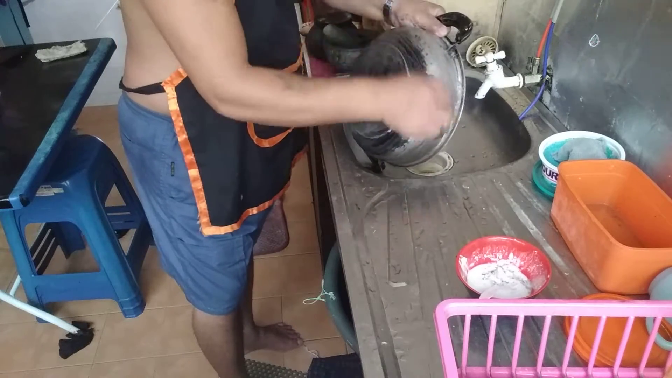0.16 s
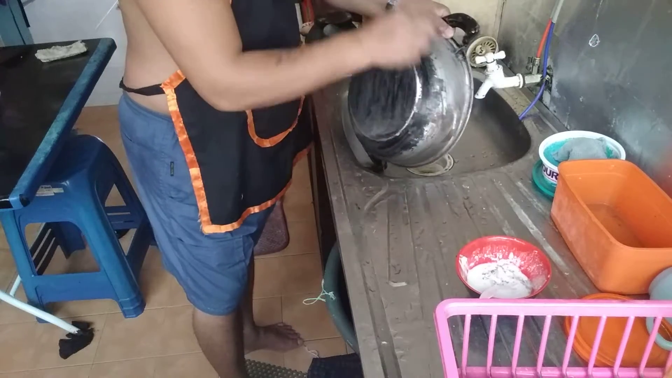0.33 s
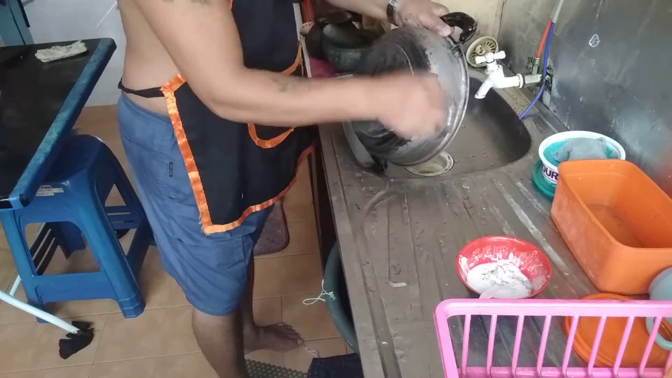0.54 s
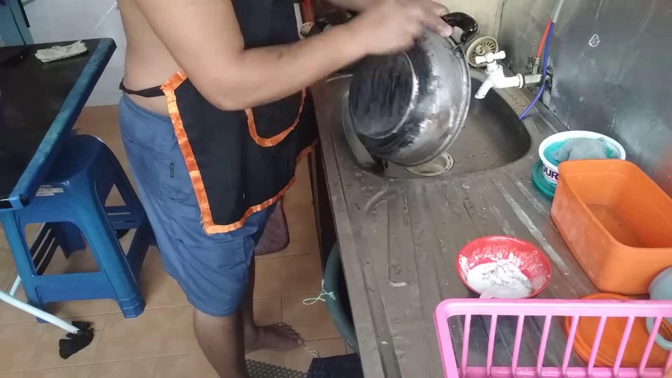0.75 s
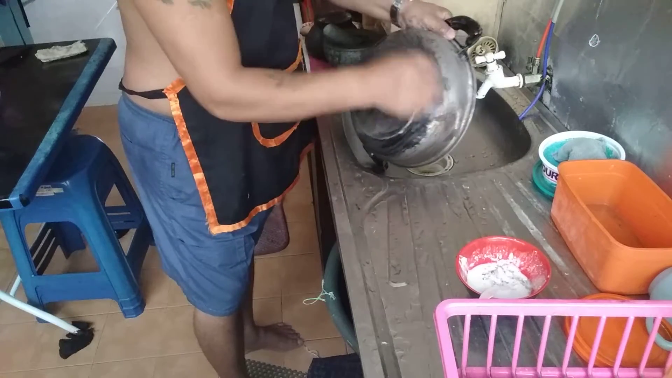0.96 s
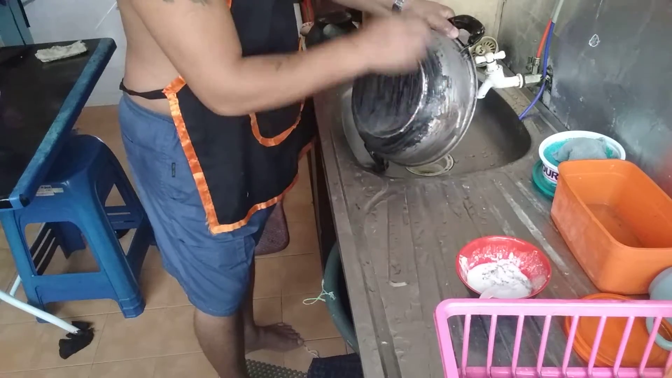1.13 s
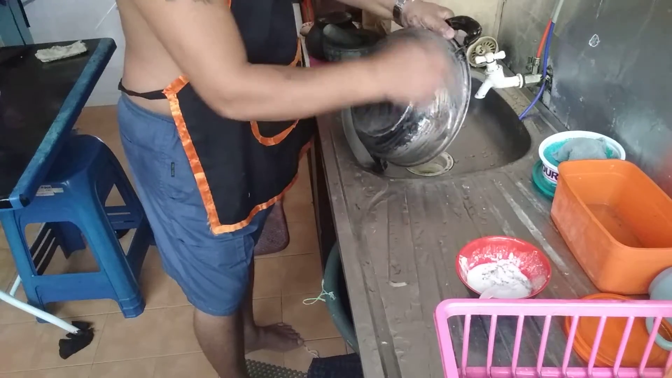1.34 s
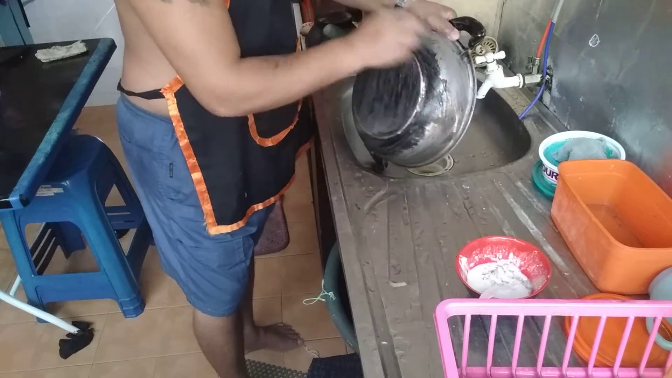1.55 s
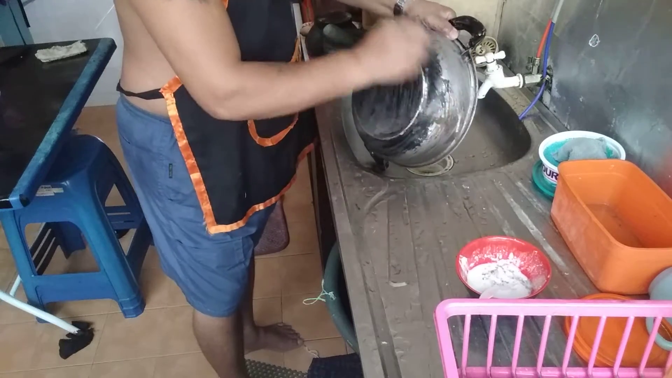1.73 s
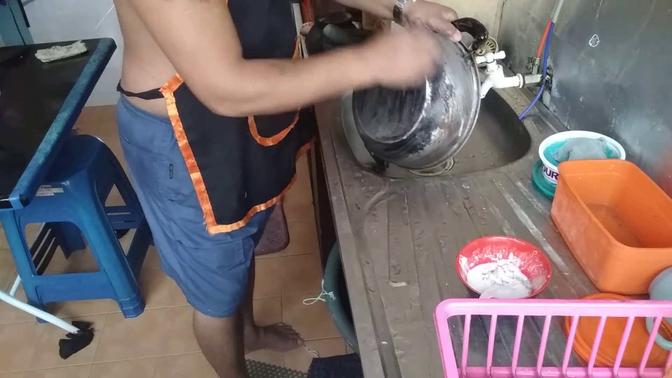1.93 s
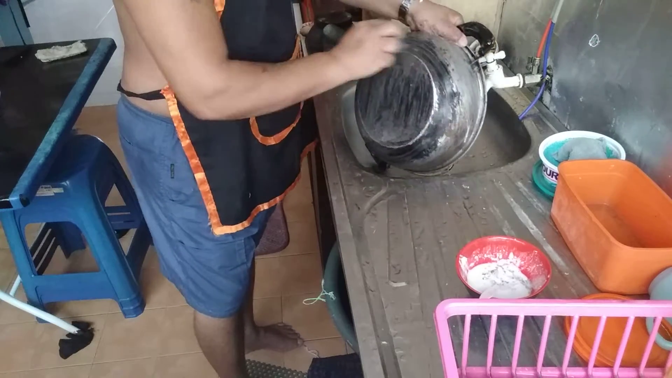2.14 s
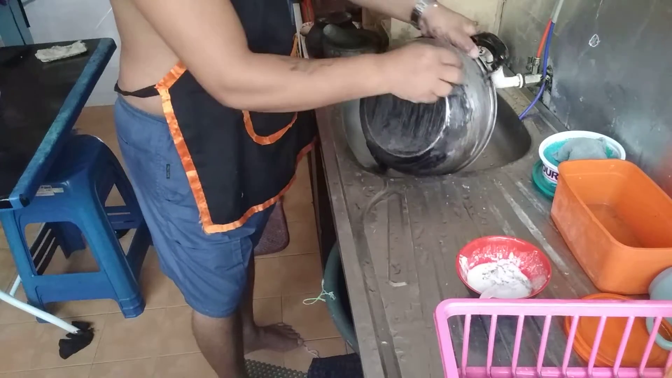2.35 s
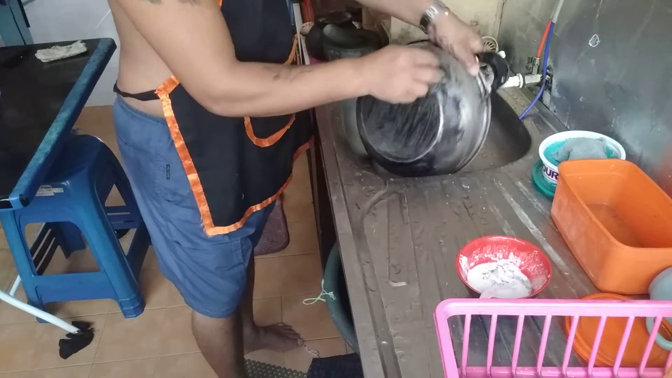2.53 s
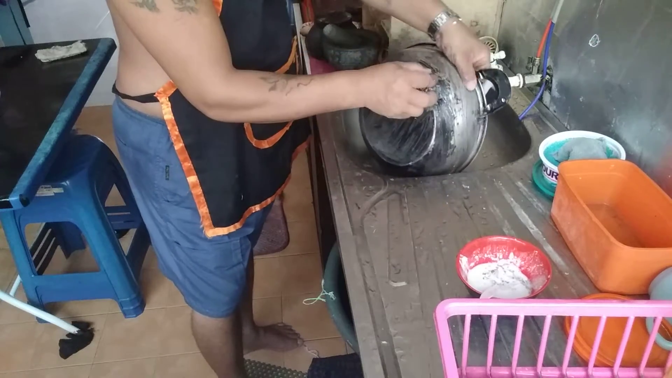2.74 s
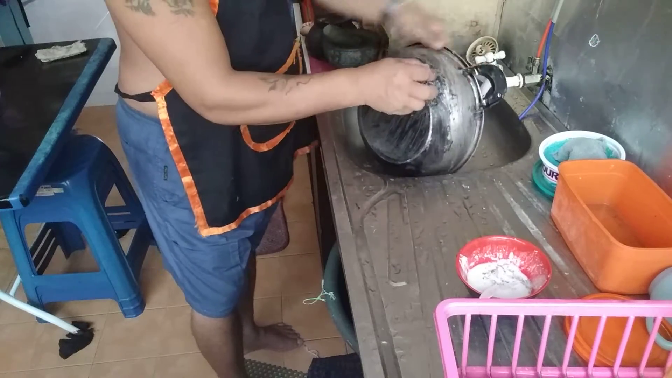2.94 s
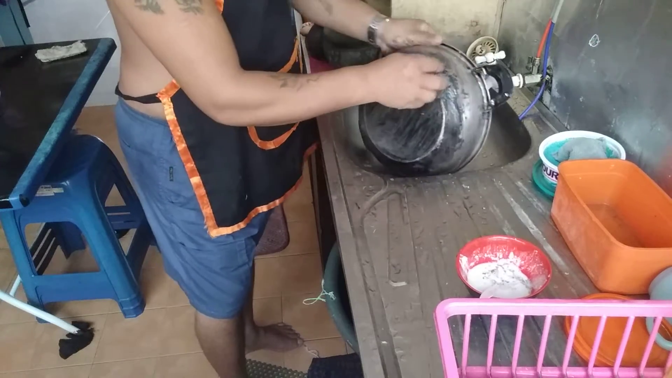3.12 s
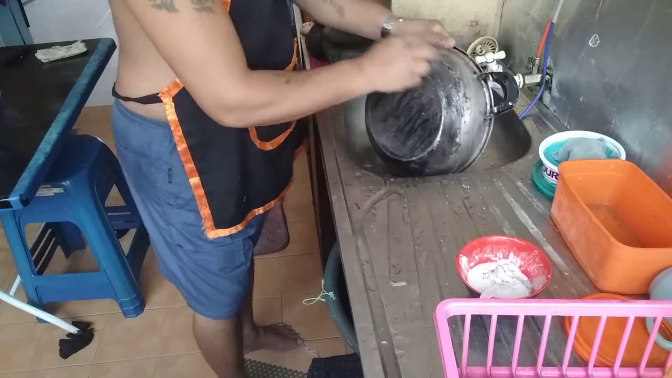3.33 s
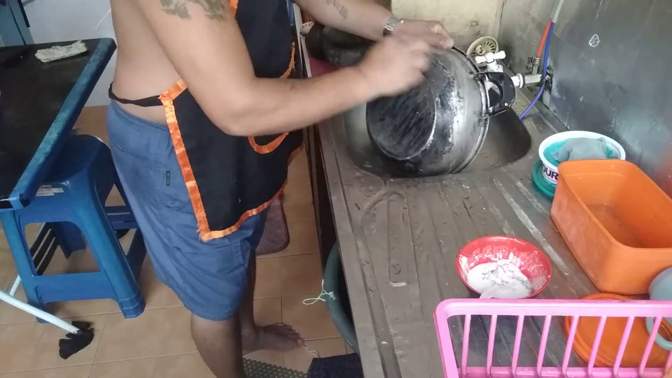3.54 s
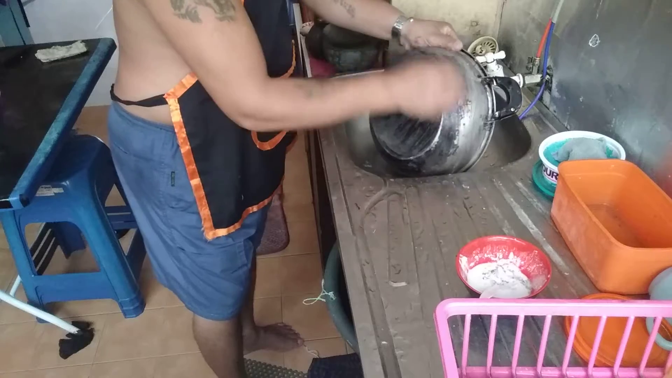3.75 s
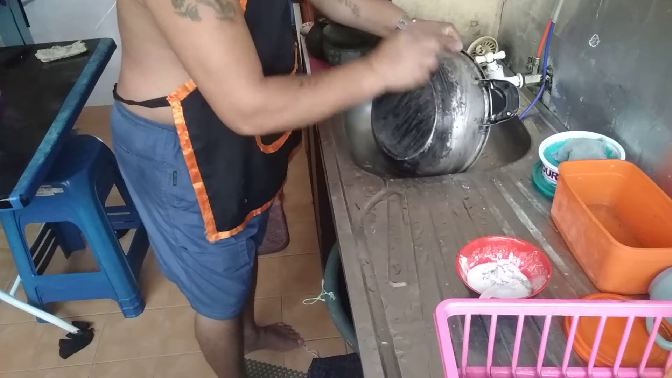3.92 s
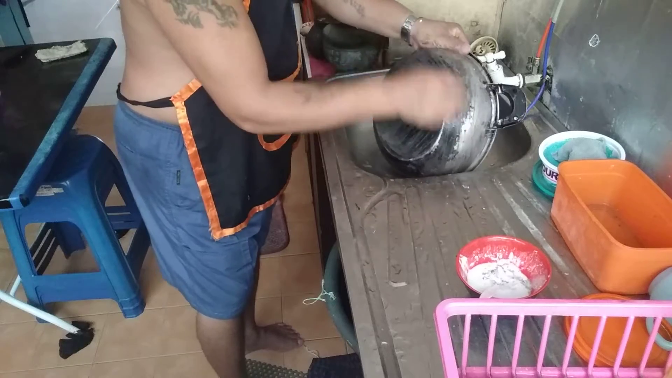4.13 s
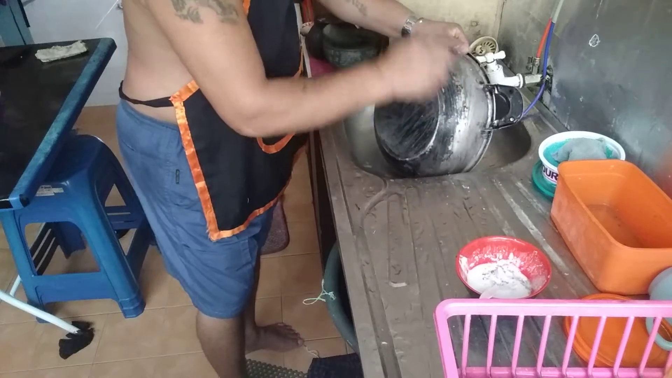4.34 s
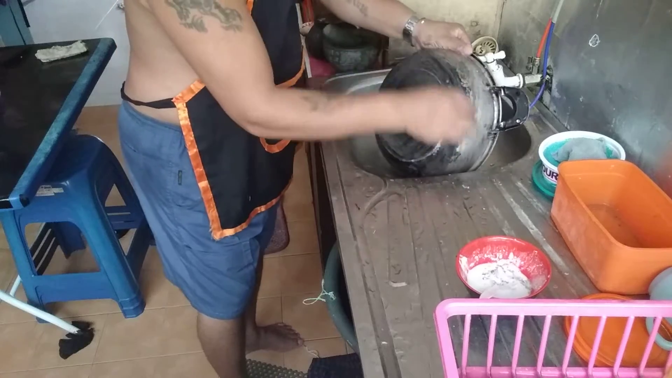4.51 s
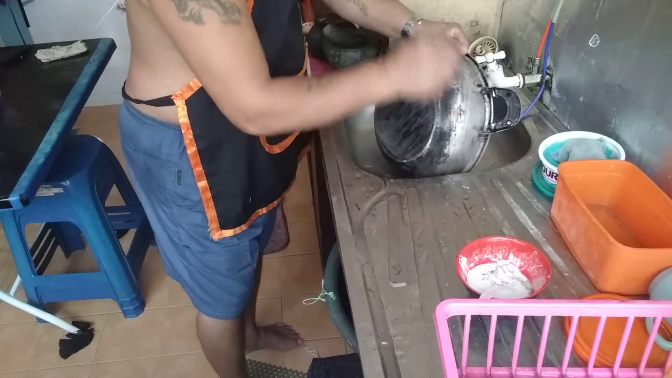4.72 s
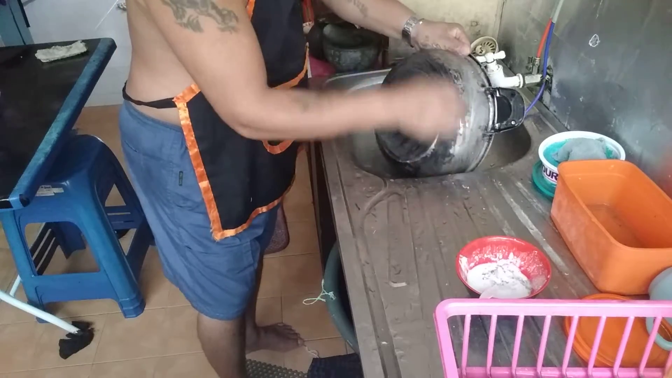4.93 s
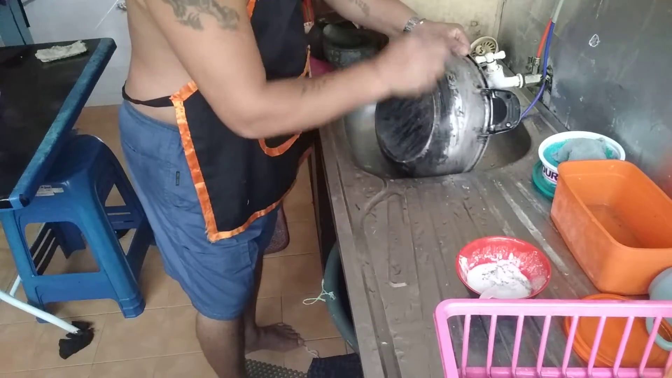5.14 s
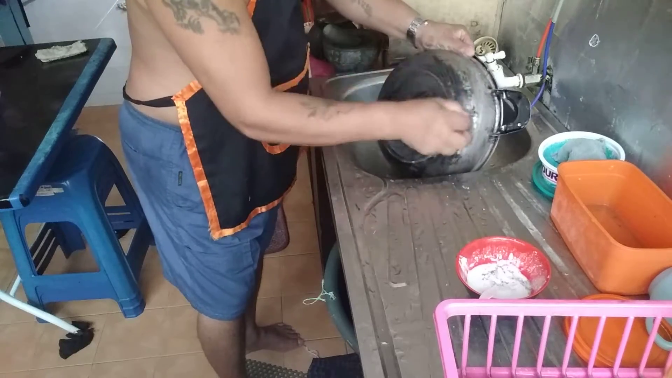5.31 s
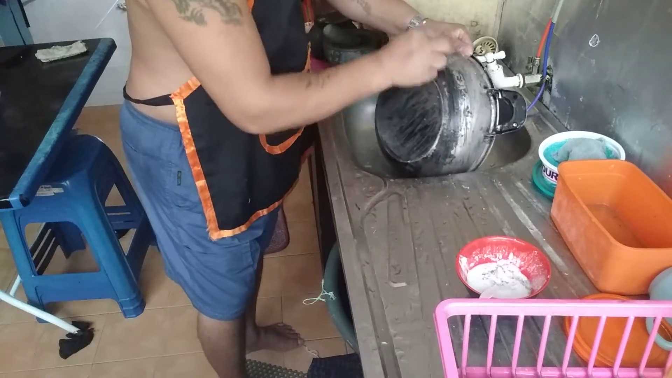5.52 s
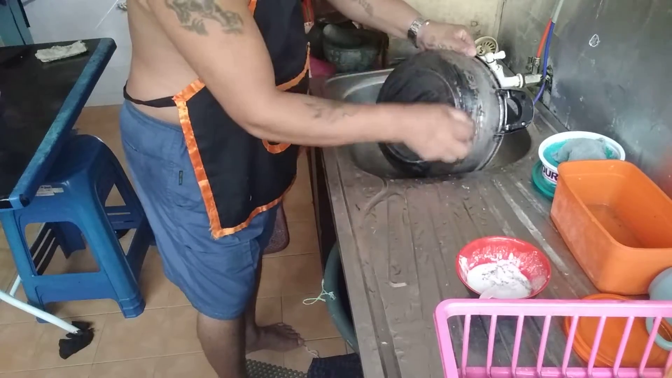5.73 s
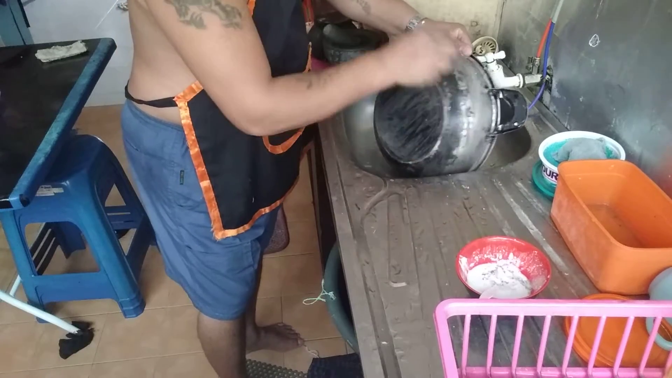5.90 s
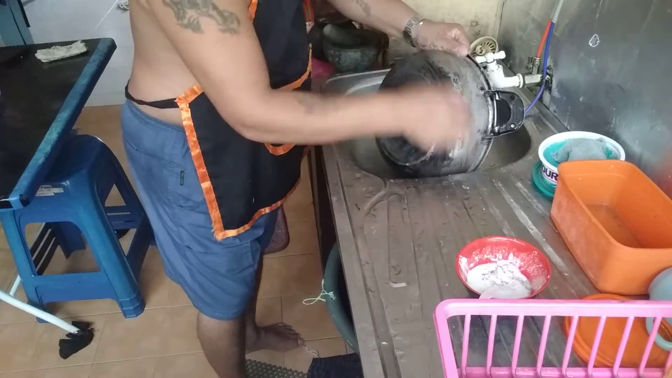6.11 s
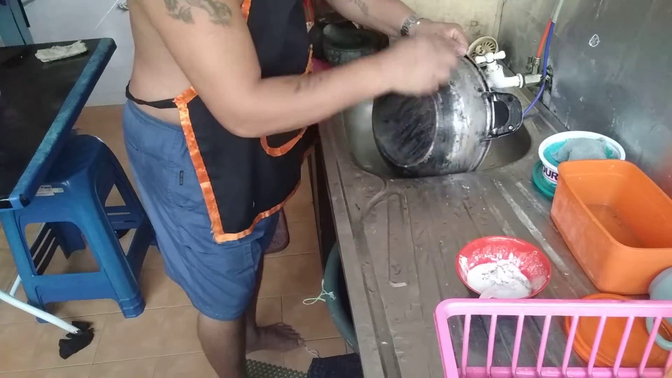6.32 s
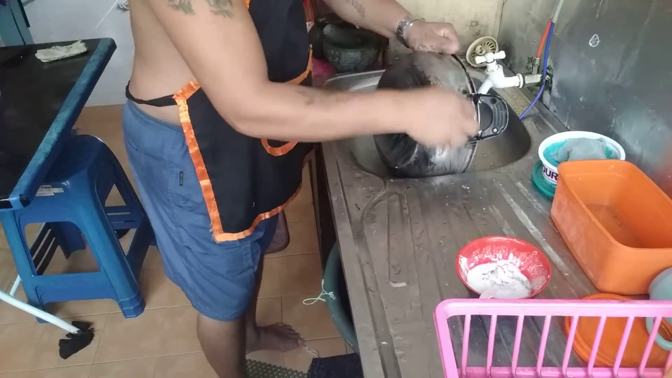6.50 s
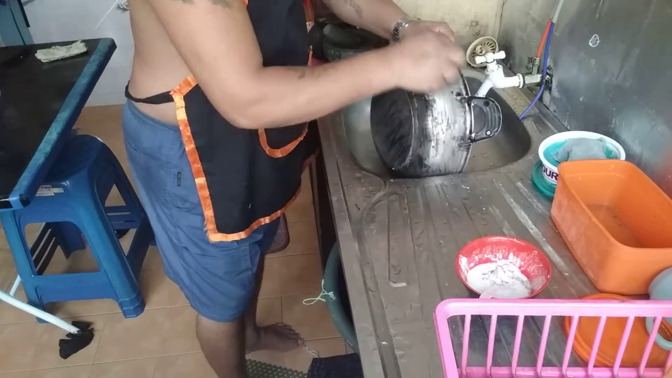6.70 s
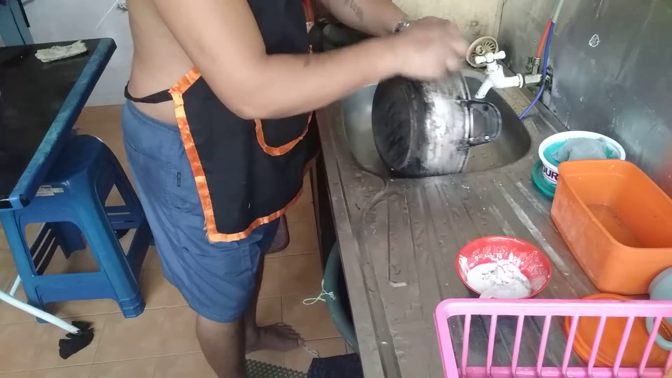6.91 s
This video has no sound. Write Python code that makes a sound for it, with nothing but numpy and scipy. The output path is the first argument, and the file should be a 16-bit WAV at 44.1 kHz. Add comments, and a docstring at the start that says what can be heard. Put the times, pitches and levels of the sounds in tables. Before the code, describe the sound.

Fast back-and-forth scrubbing of a metal pot with a wire pad, bright and raspy, broken by a short pause with a few knocks.

```python
"""Scouring a steel pot

A wire pad scrubs a pot over a kitchen sink, about five strokes a second. The wires catch and slip
in a bright gritty hiss, and the wall of the pot rings faintly under them. In a pause the pot is
turned: it drags on the sink's edge and knocks down. A small hard room, in mono."""
import sys
import numpy as np
from scipy import signal
from scipy.fft import rfft, irfft, next_fast_len
from scipy.io import wavfile

SR = 44100
rng = np.random.default_rng(int(sys.argv[2]) if len(sys.argv) > 2 else 0)


def wav_record(signal):
    """Record a signal, one row per channel, as 16-bit PCM in the file named by sys.argv[1]."""
    frames = np.transpose(np.atleast_2d(signal))
    bounded = np.clip(frames, -1, 1)
    # unit amplitude maps onto the largest positive 16-bit level
    quanta = np.round(bounded * 32767).astype(np.int16)
    wavfile.write(sys.argv[1], SR, quanta)


N = 311346
TIME = np.arange(N) / SR


# pad strokes, up and down by turns: t/s, relative peak level/dB, place of the peak in the stroke/0-1
PAD_STROKES = [(-0.16, -17, 0.53), (0.03, -16, 0.53), (0.235, -17, 0.44), (0.433, -16, .5),
               (0.65, -15.5, 0.43), (0.846, -16, 0.53), (1.07, -16.5, .48), (1.253, -16.5, .53),
               (1.473, -15.5, 0.46), (1.678, -16.5, .58), (1.893, -14.5, 0.32), (2.16, -18, 0.56),
               (3.25, -23.5, 0.61), (3.5, -18, 0.62), (3.742, -17.5, 0.42), (3.906, -16.5, 0.6),
               (4.142, -17, 0.38), (4.323, -16, 0.46), (4.532, -17, 0.42), (4.728, -16.5, 0.52),
               (4.927, -16, 0.43), (5.126, -15.5, 0.46), (5.376, -18, 0.48), (5.575, -15.5, 0.45),
               (5.799, -16.5, 0.4), (6.013, -16, 0.58), (6.222, -17, 0.37), (6.4, -22, 0.45),
               (6.56, -24.5, 0.36), (6.716, -28.5, 0.45), (6.855, -30, 0.52), (6.997, -29.5, .35)]
# the pad's light slide while the pot is turned: t/s, relative level/dB
PAD_SLIDE = [(2.37, -39), (2.45, -26.5), (2.55, -35), (2.63, -46), (2.77, -55), (2.88, -45), (2.98, -59),
             (3.12, -41), (3.27, -40.5), (3.36, -52)]
# slow level ride on the pot's ring and the coarse scrape: t/s, level/dB
BODY_RIDE = [(0, -2.5), (0.7, -5), (1.0, 0), (1.5, -2.5), (2.25, 2), (2.5, -1), (4.3, 0.6), (5.7, 0.3),
             (6.55, -4), (7.0, 3.5)]

def hand(usual_s=0.21, pause_s=0.4, overlap_s=0.024, speed_power=1.687, linger=0.55, push_db=0.5):
    """The hand speeds up and slows in each stroke: envelopes for hiss, coarse scrape and pot."""
    slide = amp(np.interp(TIME, *np.transpose(PAD_SLIDE), left=-np.inf, right=-np.inf))
    hiss_power, force_power = slide ** 2, slide ** 2
    gaps = np.diff([row[0] for row in PAD_STROKES] + [np.inf])
    for k, ((start, db, peak_at), gap) in enumerate(zip(PAD_STROKES, gaps)):
        length = gap if gap < pause_s else usual_s
        # the wires keep sliding around each turn, so strokes overlap
        moments = [start - overlap_s, start + np.clip(peak_at, 0, 1) * length, start + length + overlap_s]
        speed = np.sin(np.interp(TIME, moments, [0, np.pi / 2, 0]))
        sharpness = speed_power * (length / usual_s) ** linger  # slow strokes linger at the turns
        stroke = amp(db) * speed ** sharpness
        push = amp(push_db if k % 2 else -push_db)  # down strokes press harder
        hiss_power += stroke ** 2
        force_power += (stroke * push) ** 2
    hiss, force = np.sqrt(hiss_power), np.sqrt(force_power)
    body_db = np.interp(TIME, *np.transpose(BODY_RIDE))
    coarse = force * amp(-16.5 + 0.4 * body_db)
    pot = force ** 0.8 * amp(-35 + body_db)  # shaken by pressure too, it swells less than the hiss
    return hiss, coarse, pot


# EQ curves of the wire tips' fizz, the coils' scrape and the pot's wall: f/Hz, level/dB
TIP_EQ = [(1500, -60), (4000, -30), (6000, -20.5), (8000, -10.5), (10000, -5), (11700, -0.5), (13200, 1.5),
          (14700, -1), (15800, -3.5)]
COIL_EQ = [(500, -17), (2000, -19.5), (3400, -19.5), (4600, 0.5), (6000, 5), (8000, 3), (15000, -12.5)]
WALL_EQ = [(40, 10.5), (110, -0.5), (200, 9), (300, -2.5), (480, -0.5), (800, -17), (1150, -4), (1900, -4),
           (3300, -3.5), (6000, -8), (15000, -18)]
# resonances of the hand-damped pot, and of the sink with its counter: f/Hz, width/Hz, level/dB
POT_MODES = [(665.3, 14, -4.5), (1112, 114, -10.5), (1308, 25, -2.5), (2154, 21.6, -2), (2446, 30, -3.5),
             (2867, 31, 0.5), (3194, 38, 2), (3430, 46, -5.5), (3757, 95, -0.5), (4254, 47, 4),
             (4635, 99, -1), (5510, 95, 2.5), (6080, 120, -3), (7120, 100, 4), (7740, 120, 0)]
SINK_MODES = [(114.5, 5, 1.5), (187, 44, 5.5), (288.2, 7.2, 15.5), (403, 40, 0), (520, 7.1, -8),
              (585, 97, -6.5)]

def scouring():
    """Wire tips fizz, whole coils scrape, and their drag shakes the pot and the sink beneath."""
    hiss, coarse, pot = hand()
    # the pad grips unevenly, and its wires let go in bunches
    grip = amp(0.21 * wobble(rate_hz=80) + 0.5 * wobble(rate_hz=580))
    tips = colour(slips(per_s=24000), TIP_EQ) * hiss * amp(1.42)
    coils = colour(slips(per_s=9000, spread_db=-1.5), COIL_EQ) * coarse * amp(0.67)
    wall = colour(slips(per_s=4000, spread_db=3.5), WALL_EQ) * pot
    drag = slips(per_s=4000, spread_db=3.5) * pot
    pot_ring = ring(drag, POT_MODES, wander_db=2.5) * amp(19)
    sink_ring = ring(drag, SINK_MODES) * amp(2)
    fizz = shimmer(grip * tips, depth_db=1.22, patch_hz=220, patch_s=0.029)
    rasp = shimmer(grip * (coils + wall), depth_db=3.5, patch_hz=140, patch_s=0.063)
    return fizz + rasp + pot_ring + sink_ring


def slips(per_s, spread_db=0):
    """Metal catches and lets go in random clicks; with no spread they are all one size."""
    size = amp(spread_db * np.minimum(rng.exponential(1, N), 4))
    return unit(size * rng.choice([-1, 1], N) * (rng.random(N) < per_s / SR))


def shimmer(x, depth_db, patch_hz, patch_s):
    """Random patches of the spectrum swell and fade, giving the hiss and rasp a shifting shimmer."""
    window, hop = 1024, 256
    spectra = signal.stft(x, SR, nperseg=window, noverlap=window - hop)[2]
    bins, frames = spectra.shape
    across_hz = np.fft.fftfreq(bins, SR / window)[:, None] * patch_hz
    across_s = np.fft.fftfreq(frames, hop / SR) * patch_s
    blur = np.exp(-np.pi * (across_hz ** 2 + across_s ** 2))
    speckle = rng.standard_normal(spectra.shape)
    patches = unit(np.fft.ifft2(np.fft.fft2(speckle) * blur).real)
    spectra *= amp(depth_db * patches)
    return signal.istft(spectra, SR, nperseg=window, noverlap=window - hop)[1][:N]


def ring(x, modes, pitch=1, wander_db=0):
    """Damped modes ring under x; with wander, a moving contact feeds each one unevenly."""
    out = np.zeros(N)
    for hz, width, db in modes:
        drive = x * amp(wander_db * wobble(rate_hz=4)) if wander_db else x
        out += amp(db) * signal.lfilter(*signal.iirpeak(hz * pitch, hz / width, SR), drive)
    return out


# the pot hits the sink: t/s, thud level/dB, sink pitch/ratio, clank level/dB,
# clack f/Hz, clack level/dB, tick level/dB, rattle decay/s
POT_HITS = [(2.634, -18, 0.97, -36.5, 565, -39, -36.5, 0.034),
            (2.748, -35, 0.79, -37.5, 1560, -51, -56, 0.037),
            (3.008, -24.5, 0.96, -48, 1270, -48.5, -45, 0.065),
            (6.601, -47, 0.99, -43.5, 395, -48.5, -38, 0.03)]
# EQ curves of a hit's dull clank and bright tick: f/Hz, level/dB
CLANK_EQ = [(80, -32), (400, 11.5), (700, -1.5), (1100, 1), (1650, 1), (2500, -19.5), (5000, -27),
            (15000, -45)]
TICK_EQ = [(300, -62), (2000, 18), (4000, 12), (7000, 11.5), (11000, 17.5), (15000, -36)]

def knocks(push_s=0.0015, rebound=0.15, rebound_s=0.0075, chatter=0.037, clack_width_hz=380):
    """Each blow pushes the sink into a thud; the rim clacks, chatters and sets the pot ringing."""
    out = np.zeros(N)
    clank, tick, rattle = noise(CLANK_EQ), noise(TICK_EQ), rng.standard_normal(N)
    for start, thud_db, pitch, clank_db, clack_hz, clack_db, tick_db, decay_s in POT_HITS:
        age = np.maximum(TIME - start, 0)
        decay = (age > 0) * np.exp(-age / decay_s)
        # the pot lands on one point, then settles on a second
        first, second = age / push_s, np.maximum(age - rebound_s, 0) / push_s
        landing = first * np.exp(-2 * first) + rebound * second * np.exp(-2 * second)
        thud = ring(landing + chatter * rattle * decay + 1e-12, SINK_MODES, pitch)
        rim = [(clack_hz, clack_width_hz, 0)]
        clack = unit(ring(ring(rattle, rim), rim))
        metal = decay * (amp(clank_db) * clank + amp(clack_db) * clack + amp(tick_db) * tick)
        out += amp(thud_db) * thud / abs(thud).max() + metal + ring(metal + 1e-12, POT_MODES)
    return out


# soft booms of the pot against the basin: t/s, level/dB, f/Hz
BASIN_BOOMS = [(0.07, -43, 118), (0.261, -46.5, 155), (1.0, -47, 59.6), (1.51, -41, 87.6), (1.74, -51, 111),
               (2.04, -45.5, 87.5), (4.28, -51.5, 55), (6.6, -45, 98)]

def bumps(width_hz=70, rise_cycles=2.7):
    """The pot rocks under the hand, and the basin answers with soft low booms."""
    out = np.zeros(N)
    for start, db, hz in BASIN_BOOMS:
        rise_s = rise_cycles / hz
        age = np.maximum(TIME - start, 0) / rise_s
        basin = [(hz, width_hz, 0)]
        rumble = ring(ring(rng.standard_normal(N), basin), basin)
        boom = rumble * age * np.exp(-age)
        out += amp(db) * boom / np.sqrt(np.sum(boom ** 2) / (2 * rise_s * SR))
    return out


# the rim drags on the sink's edge: centre t/s, half length/s, scrape level/dB, judder level/dB
RIM_DRAGS = [(0.417, 0.013, -35, -34), (2.546, 0.087, -44.5, -71), (3.106, 0.039, -52, -48),
             (6.716, 0.017, -47.5, -63), (6.854, 0.046, -51.5, -65)]
# EQ curve of the rim's scrape: f/Hz, level/dB
RIM_EQ = [(100, 7.5), (300, -0.5), (800, -7.5), (1220, 4.5), (1550, -2.5), (2000, -5), (3000, -5),
          (12000, -10)]

def drags(judder_hz=143, unsteady=0.0396):
    """The rim scrapes over the steel edge; pressed hard, it sticks and slips in a short low grunt."""
    scrape = colour(slips(per_s=1700), RIM_EQ)
    slip_hz = judder_hz * (1 + unsteady * wobble(rate_hz=58))
    judder = unit(np.sin(2 * np.pi * np.cumsum(slip_hz) / SR))
    out = np.zeros(N)
    for centre, half_s, scrape_db, judder_db in RIM_DRAGS:
        swell = np.exp(-0.5 * ((TIME - centre) / half_s) ** 2)
        out += swell * (amp(scrape_db) * scrape + amp(judder_db) * judder)
    return out


# the kitchen's reverb time: f/Hz, T60/s
KITCHEN_DECAY = [(100, 0.32), (500, 0.46), (2000, 0.16), (8000, 0.21), (15000, 0.17)]

def kitchen(x, wet_db, predelay_s=0.0044):
    """Hard walls add a short tail, with the treble dying first."""
    hz, t, spectra = signal.stft(rng.standard_normal(SR // 2), SR, nperseg=256)
    spectra *= amp(-60 * t / lookup(KITCHEN_DECAY, hz)[:, None])
    tail = signal.istft(spectra, SR)[1]
    tail *= TIME[:len(tail)] > predelay_s
    return x + amp(wet_db) * signal.fftconvolve(x, tail / np.linalg.norm(tail))[:N]


# EQ curve of the room tone: f/Hz, level/dB
ROOM_TONE_EQ = [(20, -21), (33, -13), (47, 9.5), (70, -7), (102, 5.5), (180, -9.5), (300, -14), (700, -20),
                (1500, -21), (4000, -32), (15000, -23.5)]

def room_tone(level_db=-51):
    """A low steady bed of noise."""
    return amp(level_db) * noise(ROOM_TONE_EQ)


def amp(db):
    return 10 ** (np.asarray(db) / 20)


def unit(x):
    """Scales to an rms of 1."""
    return x / np.sqrt(np.mean(x ** 2) + 1e-20)


def lookup(points, hz):
    """Reads a curve on a log-frequency axis."""
    f, value = np.transpose(points)
    return np.interp(np.log(hz + 1), np.log(f + 1), value)


def colour(x, eq):
    """Puts x through an EQ curve, at rms 1."""
    size = next_fast_len(N)
    gain = amp(lookup(eq, np.fft.rfftfreq(size, 1 / SR)))
    return unit(irfft(rfft(x, size) * gain, size)[:N])


def noise(eq):
    """Steady coloured noise."""
    return colour(rng.standard_normal(N), eq)


def wobble(rate_hz):
    """Smooth random modulation of rms 1, up to about this rate."""
    size = next_fast_len(N)
    f = np.fft.rfftfreq(size, 1 / SR)
    return unit(irfft(rfft(rng.standard_normal(size)) / (1 + (f / rate_hz) ** 2), size)[:N])


def scene():
    """Pad and pot in the kitchen, over the room tone."""
    pad = kitchen(scouring(), wet_db=-10.5)
    handling = kitchen(knocks() + bumps() + drags(), wet_db=-9)
    mono = pad + handling + room_tone()
    return np.array([mono, mono])


def record(dry, cutoff_hz=15760):
    """A steep high cut takes off the very top."""
    taps = signal.firwin(601, cutoff_hz, window=("kaiser", 9), fs=SR)
    return signal.oaconvolve(dry, taps[None], "same", axes=1)


dry = scene()
out = record(dry)
wav_record(out)
```